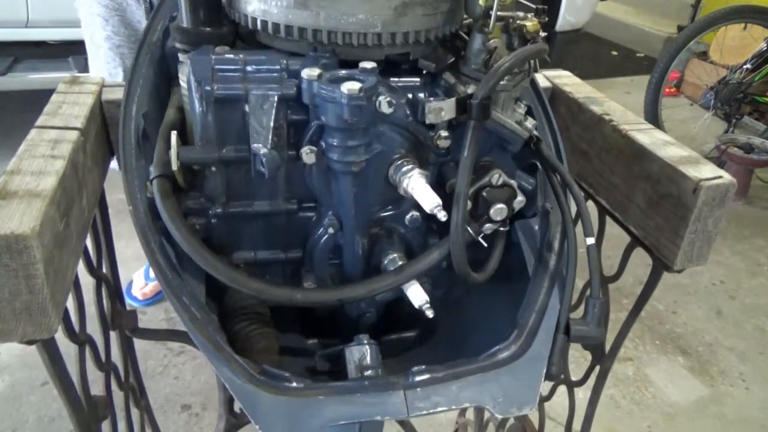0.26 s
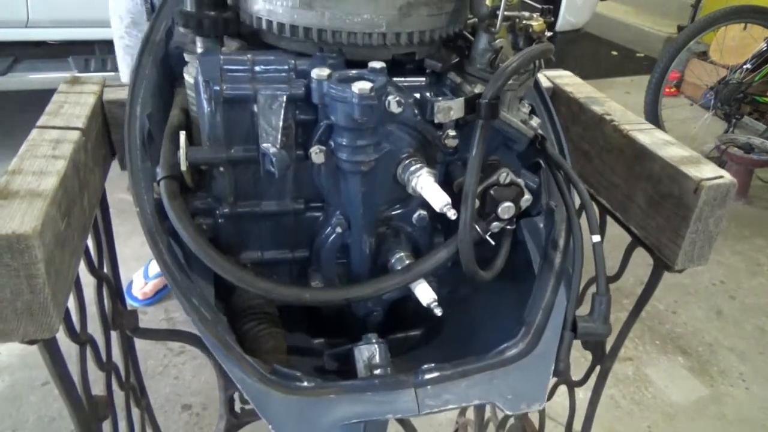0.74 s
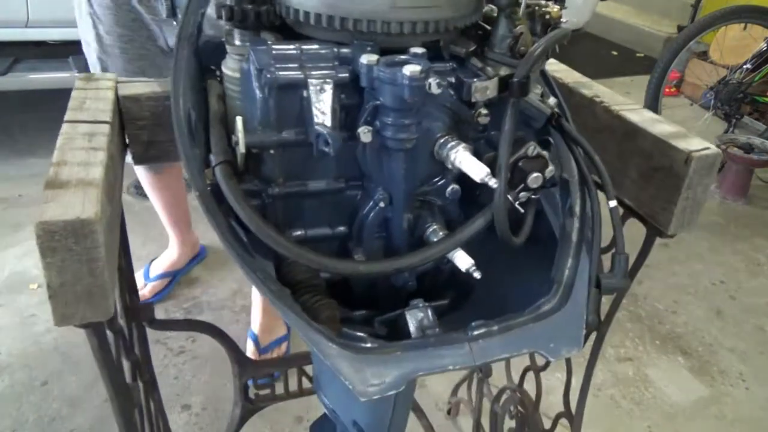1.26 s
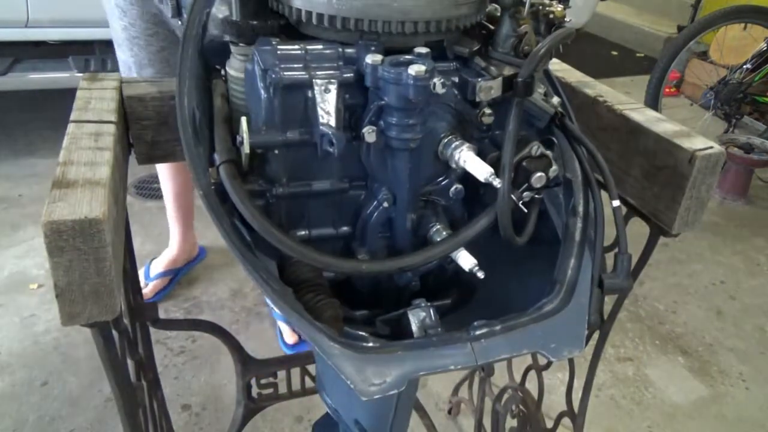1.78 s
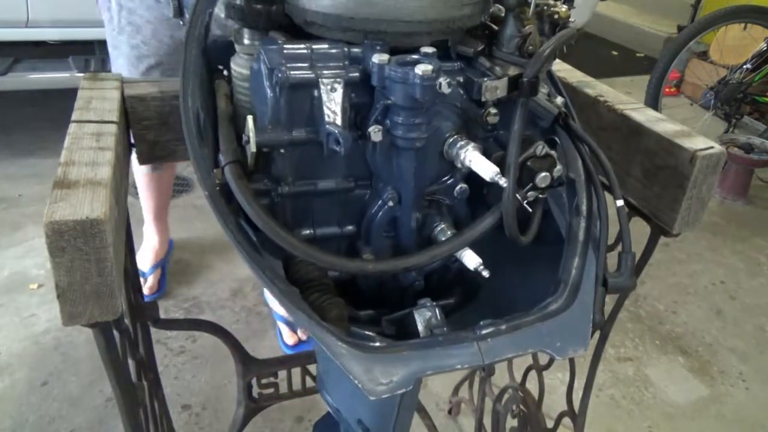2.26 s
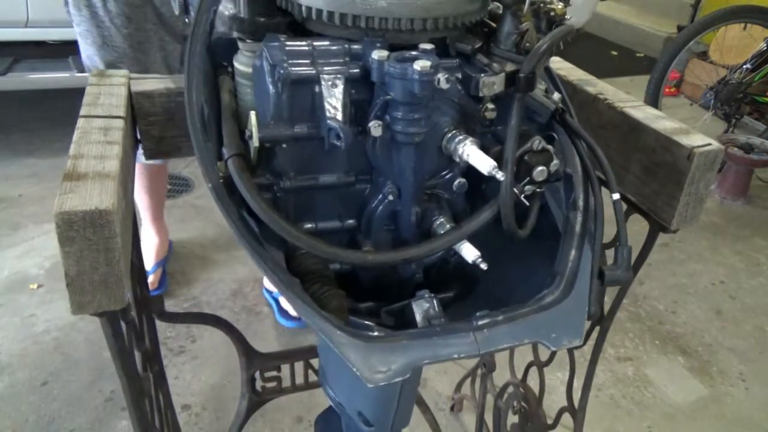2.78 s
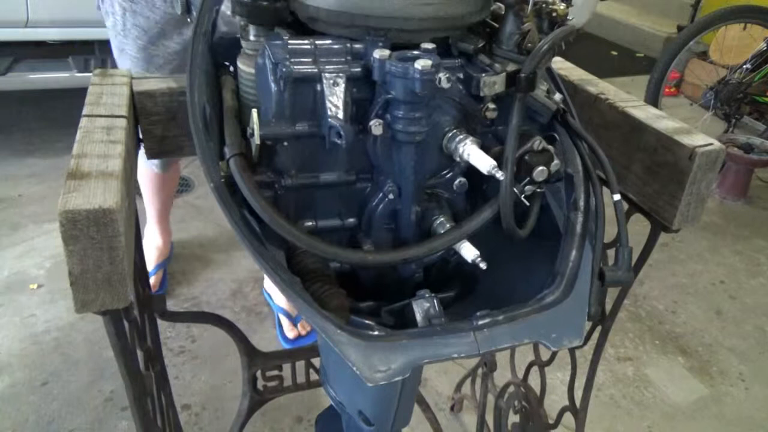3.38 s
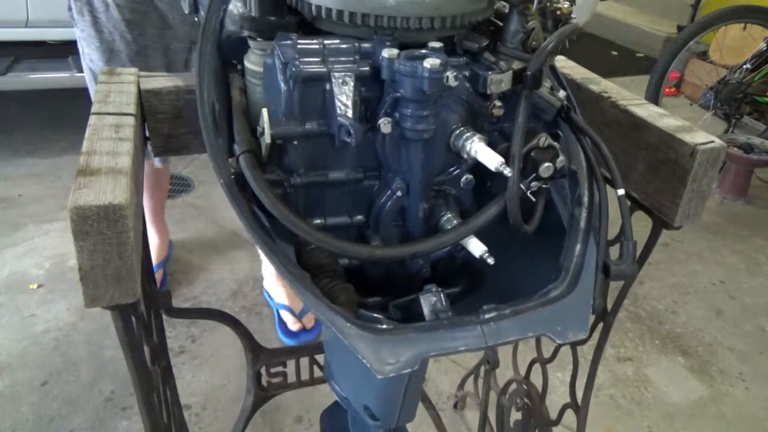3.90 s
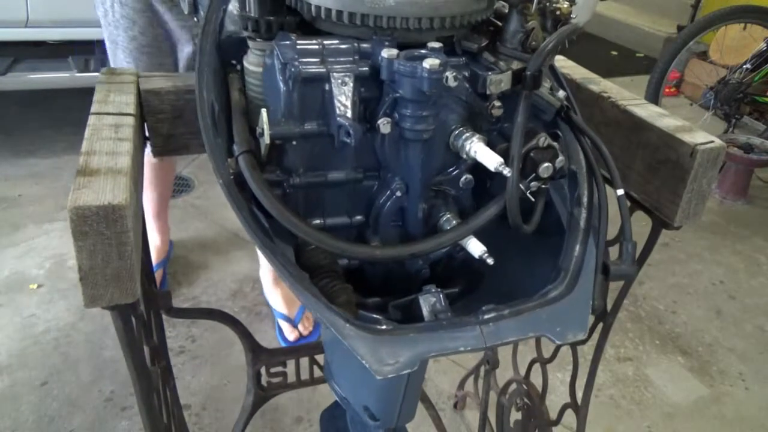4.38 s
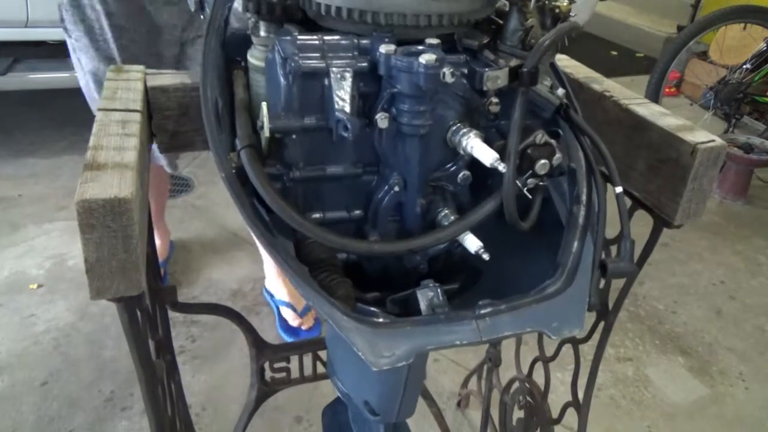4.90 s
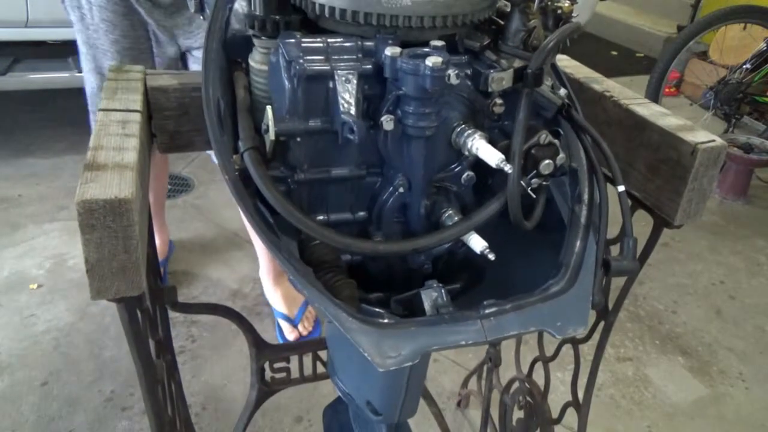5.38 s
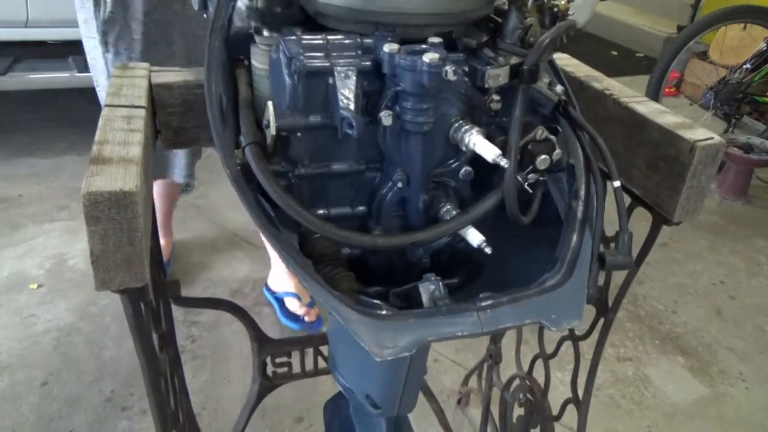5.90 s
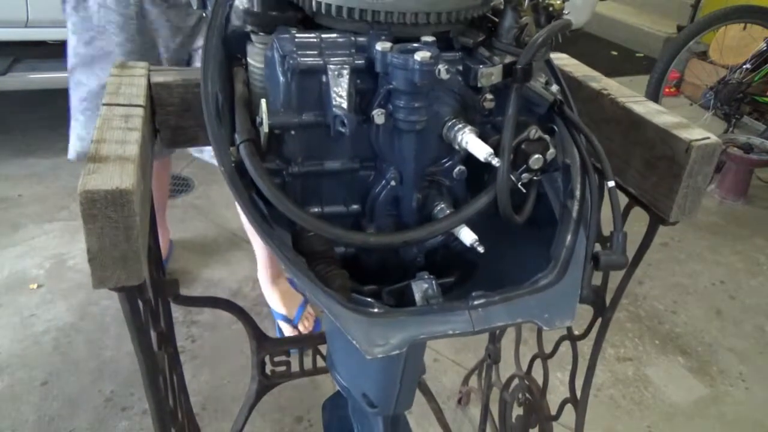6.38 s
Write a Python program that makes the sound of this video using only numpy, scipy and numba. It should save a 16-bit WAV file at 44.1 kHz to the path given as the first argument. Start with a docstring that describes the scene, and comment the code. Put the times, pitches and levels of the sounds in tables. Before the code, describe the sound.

A small two-stroke outboard motor on a wood and iron stand is pulled over by its rope six times, about once a second, without starting. Each pull gives a metallic rattle and scrape, a hollow rumble and a clunk. Then the rope runs back with a brief whine, ratchet clicks and spring slaps. A few short squeaks slip in. The sound is close, with slight reverberation off concrete and faint distant road noise.

```python
"""Over distant road noise, a small two-stroke outboard on a wood and iron stand is pulled over six times.
In a pull the pawls catch, then the rope drags the flywheel over compression: the starter drum rattles,
cowl and stand rumble, a rubbed part may squeal, and the drive clunks as the piston gives way.
Then the rope runs back: the drum whines, pawls skip over the ratchet, the recoil spring slaps its case.
After each sound comes the brief reverberation of a concrete yard."""
import sys
import numpy as np
from scipy import signal
from scipy.fft import rfft, irfft, next_fast_len
from scipy.io import wavfile
from scipy.ndimage import uniform_filter1d
from numba import njit

SR = 44100
rng = np.random.default_rng(int(sys.argv[2]) if len(sys.argv) > 2 else 0)


def generate_wav(signal):
    """Clip the signal to [-1, 1] and save it as 16-bit WAV at the path in sys.argv[1]."""
    frames = np.transpose(np.atleast_2d(signal))
    scaled = np.clip(frames, -1, 1) * 32767
    pcm = np.round(scaled).astype(np.int16)
    wavfile.write(sys.argv[1], SR, pcm)


N = 293131


def undb(db):
    return 10 ** (np.asarray(db) / 20)


def unit(x):
    return x / np.sqrt(np.mean(x ** 2))


def curve(times, values):
    return np.interp(np.arange(N) / SR, times, values)


def band(x, lo_hz, hi_hz):
    return signal.sosfilt(signal.butter(3, [lo_hz, hi_hz], "bandpass", fs=SR, output="sos"), x)


def colour(x, response):
    """Spectral shaping: gain in dB is interpolated over log frequency."""
    size = next_fast_len(N)
    hz, db = np.transpose(response)
    f = np.arange(size // 2 + 1) * SR / size + 1
    gain = undb(np.interp(np.log(f), np.log(hz), db))
    return irfft(rfft(x, size) * gain, size)[..., :N]


def resonate(x, hz, q):
    """Forced resonance of one mode with quality factor q."""
    return signal.lfilter(*signal.iirpeak(hz, q, SR), x)


def ring(x, modes, direct_db):
    """Modal superposition: damped resonances add to a direct path for the contact noise."""
    length = x.shape[-1]
    size = next_fast_len(length)
    f = np.arange(size // 2 + 1) * SR / size + 1
    resonances = sum(undb(db) / (1 + 1j * hz / width * (f / hz - hz / f)) for hz, width, db in modes)
    return irfft(rfft(x, size) * (undb(direct_db) + resonances), size)[..., :length]


@njit
def moving_resonance(x, hz, damping):
    """State-variable resonator: the centre moves, the relative bandwidth (damping) stays constant."""
    y, band_state, low_state = np.empty(len(x)), 0., 0.
    for i in range(len(x)):
        g = np.tan(np.pi * hz[i] / SR)
        v = (band_state + g * (x[i] - low_state)) / (1 + g * (g + damping))
        band_state, low_state = 2 * v - band_state, low_state + 2 * g * v
        y[i] = damping * v
    return y


def walk(rate_hz):
    """Random modulation: held and smoothed steps with a deviation near 1."""
    step = int(SR / rate_hz)
    return uniform_filter1d(np.repeat(rng.standard_normal(N // step + 1), step), step // 2 + 1)[:N]


def chatter(per_s, spread_db, tail_ms):
    """Shot noise: many small uneven contacts, each a burst that decays exponentially."""
    chance, kicks = rng.random((int(per_s * N / SR), 2)), np.zeros(N)
    strength_db = spread_db * np.minimum(-np.log(1 - chance[:, 1]), 4)
    kicks[(chance[:, 0] * N).astype(int)] = undb(strength_db)
    fade = np.exp(-1000 / (tail_ms * SR))
    return unit(signal.lfilter([1], [1, -fade], kicks) * rng.standard_normal(N))


def swell(start, hold, db, shape):
    """One envelope per event; shape is (delay [s], attack [s], sag [dB/s], release [dB/s])."""
    delay, attack, sag, release = shape
    t = np.arange(0, N + 64, 64) / SR - (np.asarray(start) + delay)[:, None]
    hold = np.reshape(hold, (-1, 1))
    fall_db = sag * np.clip(t, 0, hold) + release * np.maximum(t - hold, 0)
    return np.clip(t / attack, 0, 1) * undb(np.asarray(db)[:, None] - fall_db)


def power_sum(*envelopes):
    """Incoherent addition: overlapping events add in power."""
    power = sum(np.sum(gain ** 2, axis=0) for gain in envelopes)
    return curve(np.arange(len(power)) * 64 / SR, np.sqrt(power))


# Response of the stereo side signal: (frequency [Hz], gain [dB])
SIDE_RESPONSE = [(60, -28), (150, -24), (300, -23.5), (700, -15), (2500, -13), (5000, -17.5), (9000, -14),
                 (12500, -34)]
def spread(mid, side):
    """Spatial coherence: two close microphone ports share most of the sound, above all the bass."""
    side = colour(side, SIDE_RESPONSE)
    return np.array([mid + side, mid - side])


# Tyre noise spectrum: (frequency [Hz], relative level [dB])
ROAD_SPECTRUM = [(18, -39), (30, -50), (154, -13.5), (190, -5), (216, -12), (524, -15), (815, -1),
                 (1140, -4), (2630, -14.5), (8690, -18), (15000, -49)]
# Tyre noise contour: (time [s], level [dB])
ROAD_LEVELS = [(0, -24), (.7, -44), (2.0, -38), (2.2, -40), (3.3, -44), (4.4, -42.5), (5.55, -42.5),
               (6.65, -47)]
def road():
    """Broadband noise of far tyres, slowly modulated in amplitude."""
    mid, side = unit(colour(rng.standard_normal((2, N)), ROAD_SPECTRUM))
    level_db = curve(*np.transpose(ROAD_LEVELS)) + 2.4 * walk(6.7)
    return spread(mid, 1.85 * side) * undb(level_db)


def yard(x, echo_db=-12.5, t60_s=0.37, size=16384):
    """Reverberation: dull reflections off concrete decay exponentially; early ones add width."""
    t = np.arange(size) / SR
    dull = signal.lfilter([.45], [1, -.55], rng.standard_normal((2, size)))
    echo = dull * np.exp(-np.log(1000) * t / t60_s) * (t > .003)
    early = rng.standard_normal(size) * np.exp(-t / 0.017)
    mid = undb(echo_db) * echo[0] / np.linalg.norm(echo[0])
    side = early / np.linalg.norm(early) + 0.49 * echo[1] / np.linalg.norm(echo[1])
    return spread(x + signal.fftconvolve(x, mid)[:N], signal.fftconvolve(x, side)[:N])


# Booms of the wooden stand: (time [s], level [dB], frequency [Hz])
BEAM_BOOMS = [(0.859, -22, 201.4), (1.133, -33, 174), (1.302, -24, 207), (2.329, -34.5, 193),
              (3.428, -29, 204), (3.715, -33, 185), (4.545, -26, 205), (5.031, -27.5, 183),
              (5.706, -27, 201), (5.973, -31.5, 172), (6.076, -27, 202)]
def beam_booms(decay_s=0.051, size=8192):
    """Damped free vibration: the beams boom as the load shifts, and waver as they rock."""
    out, t = np.zeros(N + size), np.arange(size) / SR
    envelope = (1 - np.exp(-t / .004)) * np.exp(-(t / decay_s) ** 1.3)
    for time, db, hz in BEAM_BOOMS:
        i = int(time * SR)
        out[i:i + size] += undb(db) * np.sin(2 * np.pi * hz * t) * envelope
    return out[:N] * (1 + 0.11 * walk(120))


# Squeals of rubbed parts: (time [s], hold [s], frequency [Hz], level [dB])
RUB_SQUEALS = [(0.07, 0.048, 1925, -23.5), (1.225, .13, 9230, -37.5), (1.33, 0.052, 1946, -23),
               (2.307, 0.063, 2590, -27), (2.324, 0.05, 6900, -27), (4.897, 0.063, 2610, -27)]
def squeals(relative_width=.012, shape=(.001, .02, 5, 250)):
    """Frictional excitation: noise drives one narrow mode, so a part briefly sings alone."""
    out = np.zeros(N)
    for time, hold, hz, db in RUB_SQUEALS:
        tone = unit(resonate(rng.standard_normal(N), hz, 1 / relative_width))
        out += tone * power_sum(swell([time], [hold], [db], shape))
    return out


# Modes of the recoil spring: (frequency [Hz], relative level [dB], T60 [s])
SPRING_MODES = [(6600, -6, .1), (7320, 0, .14), (7980, -4, .1), (8610, -2, .12), (9080, 0, .12)]
# Slips of the spring: (time [s], relative level [dB])
SPRING_SLIPS = [(0.022, -3), (2.6366, -2), (4.988, -4.5), (6.0938, -1.5)]
def spring_pings(size=16384):
    """Modal decay: the recoil spring slips in its case with a hiss and rings on."""
    out, t = np.zeros(N + size), np.arange(size) / SR
    for time, db in SPRING_SLIPS:
        tones = sum(undb(mode_db) * np.sin(2 * np.pi * (hz * t + rng.random())) * 1000. ** (-t / t60)
                    for hz, mode_db, t60 in SPRING_MODES)
        hiss = band(rng.standard_normal(size), 6200, 8300) * np.exp(-t / 0.045)
        i = int(time * SR)
        out[i:i + size] += undb(db - 18) * tones + undb(db - 3) * hiss
    return out[:N]


# The rope running back: (time [s], duration [s], rattle level [dB])
ROPE_REWINDS = [(0.161, 0.48, -30.5), (1.488, 0.36, -27), (2.852, 0.31, -29.5), (3.905, .38, -28),
                (5.083, 0.4, -29), (6.207, 0.62, -28)]
def drum_whine(hz=2410, width_hz=53, hold_s=0.077):
    """Rubbing excites a narrow resonance of the drum as it spins fast at the start of each rewind."""
    time, _, db = np.transpose(ROPE_REWINDS)
    tone = unit(resonate(chatter(150, 1.7, 12), hz, hz / width_hz))
    return tone * power_sum(swell(time, hold_s, db + 2, shape=(.01, .011, 90, 120)))


# Modes of the starter's metal parts: (frequency [Hz], bandwidth [Hz], gain [dB])
METAL_MODES = [(1227, 114, 5.5), (1575, 240, 0.5), (1966, 14, 3.5), (2273, 530, -1.5), (2730, 290, 1.5),
               (2955, 147, 1), (3243, 230, -0.5), (5630, 1500, 1), (6096, 700, 6.5), (9630, 380, -13.5)]
# Modes of the cowl: (frequency [Hz], bandwidth [Hz], gain [dB])
COWL_MODES = [(413.7, 23, -5), (470.5, 53, 1.5), (656, 87, -5.5), (864, 150, -15.5), (1072, 76, -14.5)]
def clacks(times, ring_db, hz, bright_db, dull_db, contact_ms, direct_db, size=4096):
    """Impact excitation: a burst of contact noise rings metal and cowl, led by the struck part."""
    ring_db, hz, bright_db, dull_db = (np.reshape(v, (-1, 1)) for v in (ring_db, hz, bright_db, dull_db))
    out, t = np.zeros(N + size), np.arange(size) / SR
    contact = np.exp(-(1000 * t / contact_ms) ** 2.4)  # the parts rattle together, then let go at once
    envelope = (1 - np.exp(-t / 0.00008)) * (contact + 0.93 * np.exp(-t / 0.007))
    force = envelope * rng.standard_normal((len(times), size))
    force[:, 0] += 4  # click of the first touch
    metal = ring(force, METAL_MODES, -2.5)
    struck = band(ring(metal, [(hz, 0.14 * hz, 0)], -9.5), 1320, 3670)
    bright = band(ring(force, METAL_MODES, direct_db), 3740, 13100)
    dull = band(ring(force, COWL_MODES, -13.5), 272, 1260)
    blows = sum(undb(db) * layer / np.abs(layer).max(axis=1, keepdims=True)
                for layer, db in [(struck, ring_db), (bright, bright_db), (dull, dull_db)])
    for i, blow in zip((times * SR).astype(int), blows):
        out[i:i + size] += blow
    return out[:N]


# Pawl strikes: (time [s], ring level [dB], ring frequency [Hz], dull level re ring [dB])
PAWL_STRIKES = [(0.2145, -20, 1610, 2), (0.33, -11, 3040, -47), (0.381, -12, 1710, -12),
                (0.39, -8.5, 2940, -21), (0.455, -14, 1630, -13), (0.46, -5.5, 3060, -24),
                (0.549, -9.5, 3700, -9.5), (0.7541, -13, 4040, -17.5), (0.7792, -17.5, 1650, -9),
                (0.819, -13.5, 1620, -17), (1.5097, -8, 2190, -4), (1.5541, -9, 2430, -4.5),
                (1.5822, -7, 2960, -9), (1.59, -8, 1460, -18), (1.6735, -7, 3260, -19),
                (1.7836, -4.5, 3200, -22), (2.234, -19.5, 3700, -17), (2.2553, -18.5, 2220, -12),
                (2.2989, 7, 2510, -21), (2.8537, -6, 2740, -34), (2.9192, -11.5, 3100, -13),
                (2.9736, -16, 1280, -19), (2.9831, -10.5, 3030, -33), (3.031, -10, 1260, -30),
                (3.0368, -8.5, 1620, -10.5), (3.0976, -8, 1420, -10), (3.1594, -19.5, 2230, -15),
                (3.1799, -17.5, 1270, -4), (3.311, -21, 3320, -15), (3.352, -21, 1510, -17),
                (3.366, -14, 1510, -20), (3.3808, -6, 2630, -20), (3.865, -11.5, 2130, -1),
                (4.003, -10, 2500, -21), (4.061, -20, 1250, -36), (4.07, -13, 2900, -10.5),
                (4.1207, -8.5, 1240, -21), (4.1261, -11.5, 2200, -9.5), (4.1836, -16, 1170, -9),
                (4.19, -6, 1400, -12.5), (4.2012, -8, 2280, -15), (4.261, -10.5, 2110, -13.5),
                (4.431, -14.5, 2310, -34), (4.4645, -9, 2230, -27), (4.4813, -7.5, 1530, -16.5),
                (4.495, -0.5, 2820, -28), (4.8928, 5, 2410, -28), (5.029, -11, 1550, -9),
                (5.05, -15, 1310, -4), (5.1505, -11.5, 2720, -24), (5.209, -24, 1670, -26),
                (5.2174, -8.5, 3170, -29), (5.269, -19, 1600, -15), (5.2757, -7, 3030, -26),
                (5.332, -30, 1490, -24), (5.3407, -5.5, 1480, -19.5), (5.3461, -8, 2900, -11.5),
                (5.6039, -14, 3450, -29), (5.626, -14.5, 2200, -26), (5.6474, -9.5, 1510, -17),
                (5.66, 0, 1980, -25), (6.3062, -8.5, 2180, -17), (6.314, -16, 3000, -20),
                (6.3857, -19, 1530, -13), (6.391, -10.5, 2830, -15), (6.458, -15, 1280, -16),
                (6.466, -8, 1570, -12), (6.5653, -6, 1160, -13)]
def pawl_ticks():
    """Light impacts: pawls catch before a pull and skip over the ratchet as the rope runs back."""
    time, db, hz, dull_db = np.transpose(PAWL_STRIKES)
    bright_db = db - 3.5 + 0.5 * np.log2(hz / 2500)  # higher-ringing parts are brighter too
    return clacks(time, db, hz, bright_db, db + dull_db, contact_ms=5.8, direct_db=-17)


# Slaps of the recoil spring: (time [s], bright level [dB], shiver level [dB])
SPRING_SLAPS = [(0.1714, -7, -43), (0.186, -16, -18.5), (0.4346, -2, -21.5), (0.817, -6, -41),
                (1.5967, -1, -39), (1.607, -7, -27.5), (1.733, -1, -21), (1.936, -25, -68),
                (2.006, -39, -63), (2.6057, 3, -40), (2.8642, 2.5, -25), (3.069, -0.5, -29),
                (3.3967, -3, -40), (3.931, 0, -20), (4.093, -6, -33), (4.1953, -6, -41),
                (4.3096, -12.5, -62), (4.5126, -2, -40), (4.8876, 7, -38), (5.0883, -5, -40),
                (5.0964, -1, -23.5), (5.3094, -1.5, -23.5), (5.4193, -8.5, -59), (5.6764, -6, -40),
                (6.0144, -1, -40), (6.225, -4.5, -25.5), (6.2377, -5, -37), (6.5182, -2, -25.5)]
def spring_snaps(ring_hz=2830):
    """Short impacts: the spring slaps its case and excites mainly the high modes."""
    time, db, _ = np.transpose(SPRING_SLAPS)
    return clacks(time, db - 11.5, ring_hz, db, db - 34, contact_ms=5.1, direct_db=0.5)


# Blows of the drive: (time [s], ring level [dB])
DRIVE_BLOWS = [(1.0169, -6), (1.046, -0.5), (1.0986, -2.5), (1.1206, -1), (1.296, -8.5), (2.4316, 2),
               (3.5413, -10), (3.5518, -4), (3.5704, -12.5), (4.6954, -1.5), (5.8162, 3)]
def drive_clunks(ring_hz=1490):
    """Heavy impacts: the drive slams home as the piston gives way, exciting the low modes too."""
    time, db = np.transpose(DRIVE_BLOWS)
    return clacks(time, db, ring_hz, db - 4.5, db - 3, contact_ms=9.8, direct_db=-21)


def drum_rattle(metal, ring_hz):
    """A moving resonance: the drum's loudest ring shifts with rope tension and speed."""
    block = .7 * metal + 1.1 * moving_resonance(metal, np.clip(ring_hz, 1000, 4000), .25)
    return unit(band(block, 1225, 3900)) * undb(1.02 * walk(40))


def rope_scrape(metal):
    """Sliding friction: rope and spring excite the high modes without a break between contacts."""
    sliding = ring(rng.standard_normal(N), METAL_MODES, -8.5)
    catching = ring(chatter(45, 1.5, 8.7), METAL_MODES, -0.5)
    friction = 0.82 * metal + 0.71 * sliding + 0.81 * catching
    return unit(band(friction, 3100, 13000)) * undb(1.28 * walk(13))


# Heaves of the rope, several to a pull; the quietest is slack being taken up: (time [s], hold [s],
# rattle level [dB], ring frequency [Hz], scrape level [dB], cowl level [dB], stand level [dB])
ROPE_HEAVES = [(-0.04, 0.12, -16, 1370, -18, -15.5, -27), (0.789, 0.1, -22.5, 2040, -22, -25, -51),
               (1.018, 0.05, -11.5, 1680, -16.5, -24, -24), (1.12, 0.25, -22.5, 1560, -30, -21, -34),
               (1.288, 0.041, -22.5, 1860, -18.5, -9.5, -21.5), (1.382, 0.033, -26.5, 1280, -48, -18, -38),
               (2.057, 0.54, -45, 1300, -35, -51, -60), (2.274, 0.1, -19.5, 2500, -18, -22.5, -39),
               (2.421, .15, -9.5, 1980, -14.5, -23, -28.5), (2.593, 0.093, -17.5, 2360, -18, -22, -31.5),
               (2.678, 0.066, -16.5, 1800, -18.5, -12, -31.5),
               (3.386, 0.09, -21.5, 2460, -19.5, -22.5, -39.5), (3.552, 0.15, -13, 2160, -14, -22, -27.5),
               (3.715, 0.13, -19.5, 2130, -18, -24, -33), (4.488, 0.12, -22, 2300, -20, -26, -40),
               (4.676, 0.19, -11, 1880, -14, -19.5, -26.5), (4.899, 0.058, -21, 2220, -18.5, -20.5, -39),
               (4.961, 0.057, -21, 1600, -23, -22.5, -55), (5.657, 0.11, -20, 2580, -18, -24, -30.5),
               (5.82, 0.17, -13.5, 1900, -15.5, -23, -29.5), (6.002, .1, -19, 2100, -20, -22.5, -35),
               (6.089, 0.071, -24, 1610, -32, -25.5, -38)]
def crank(rewind_ring_hz=2270, stand_rest_db=-52):
    """Forced vibration: loose parts rattle, rope and spring scrape, compression shakes cowl and stand."""
    time, hold, rattle_db, hz, scrape_db, cowl_db, stand_db = np.transpose(ROPE_HEAVES)
    slap_time, _, shiver_db = np.transpose(SPRING_SLAPS)
    pull = swell(time, hold, rattle_db, shape=(.001, .025, 15, 130))
    rewind = swell(*np.transpose(ROPE_REWINDS), shape=(.001, .015, 30, 120))
    slide = swell(time, hold, scrape_db, shape=(.001, .03, 20, 150))
    shiver = swell(slap_time, 0, shiver_db, shape=(.004, .005, 1.1, 100))
    cowl_shake = swell(time, hold, cowl_db, shape=(.02, .05, 10, 250))
    stand_shake = swell(time, hold, stand_db, shape=(.027, .044, 11, 230))
    rattle_gain = power_sum(pull, rewind)
    ring_hz = power_sum(pull * hz[:, None], rewind * rewind_ring_hz) / (rattle_gain + 1e-12)

    shared = chatter(300, 2.5, 5)
    # every part also has its own contacts, so the rings come and go one by one
    parts = sum(undb(db) * resonate(.5 * shared + chatter(50, 2.07, 2.04), mode_hz, mode_hz / width)
                for mode_hz, width, db in METAL_MODES)
    metal = parts + undb(-8) * shared
    rattle = drum_rattle(metal, ring_hz) * rattle_gain
    scrape = rope_scrape(metal) * power_sum(slide, rewind * undb(-10), shiver)
    panels = ring(.6 * shared + chatter(250, 1.5, 8), COWL_MODES, -17)
    cowl = unit(band(panels, 300, 1100)) * power_sum(cowl_shake, rewind * undb(-6))
    stand = unit(band(chatter(60, 1.3, 13), 54.4, 293)) * (power_sum(stand_shake) + undb(stand_rest_db))
    return rattle + scrape + cowl + stand


def scene():
    """Superposition: the outboard and its reflections add to the road noise."""
    outboard = crank() + beam_booms() + pawl_ticks() + spring_snaps() + drive_clunks()
    outboard += drum_whine() + squeals() + spring_pings()
    return yard(outboard) + road()


@njit
def limiter(peak, threshold, attack, release):
    """Envelope following: gain drops fast above the threshold and recovers more slowly."""
    gain, envelope = np.empty(len(peak)), 0.
    for i in range(len(peak)):
        envelope += (peak[i] - envelope) * (attack if peak[i] > envelope else release)
        gain[i] = threshold / max(envelope, threshold)
    return gain


# Microphone response: (frequency [Hz], gain [dB])
MIC_RESPONSE = [(30, -5.5), (300, -2.5), (1000, -1.5), (3000, -3), (4200, 0.5), (6000, -5), (8000, -5.5),
                (10000, 2.5), (12500, -6.5), (15000, -8), (16500, -66)]
def record(dry, cutoff_hz=16300):
    """Transduction: microphone colour, quick limiting, soft saturation and a steep low-pass."""
    wet = colour(dry, MIC_RESPONSE)
    wet *= limiter(np.abs(wet).max(axis=0), threshold=0.27, attack=0.072, release=0.011)
    wet = np.tanh(1.6 * wet) / 1.6
    return signal.sosfilt(signal.ellip(8, .2, 70, cutoff_hz, fs=SR, output="sos"), wet)


dry = scene()
out = record(dry)
generate_wav(out)
```